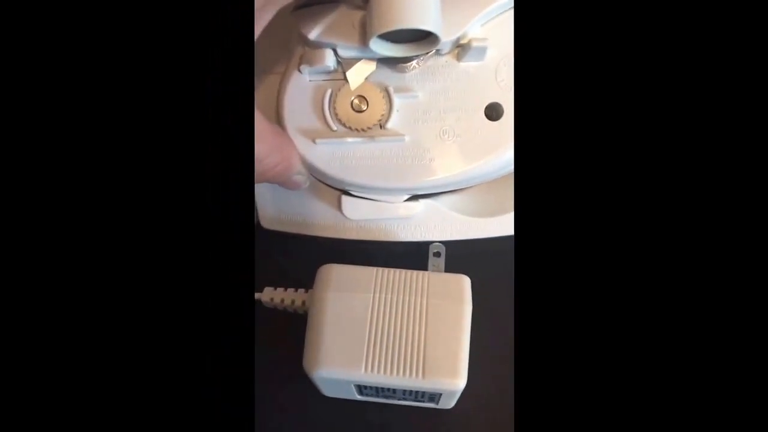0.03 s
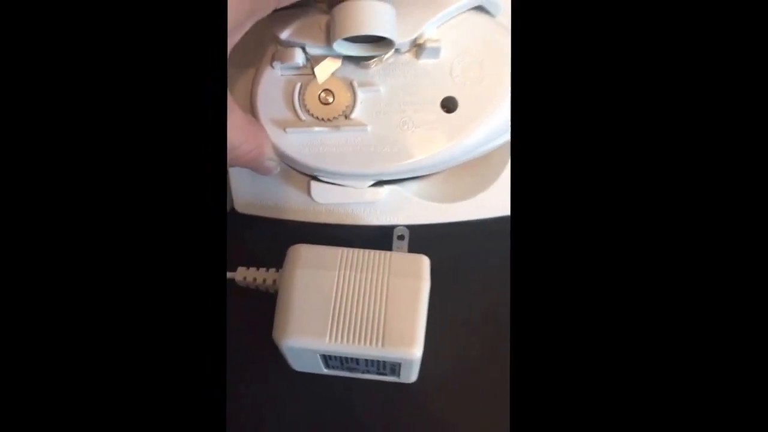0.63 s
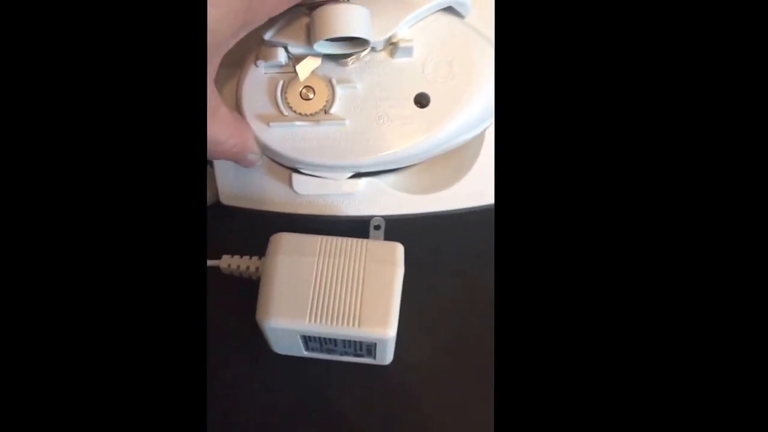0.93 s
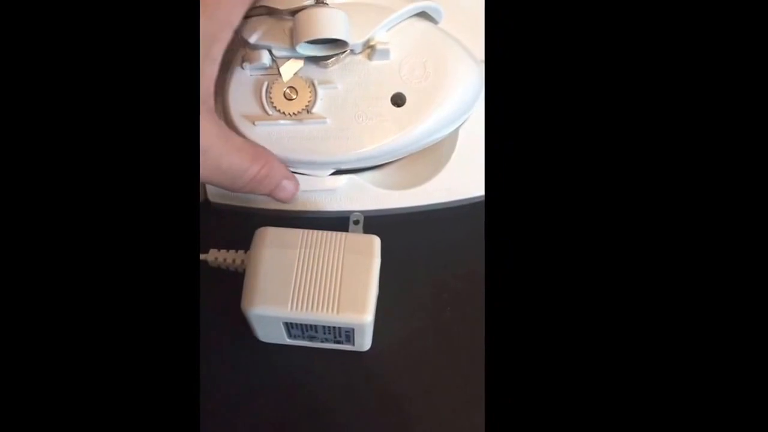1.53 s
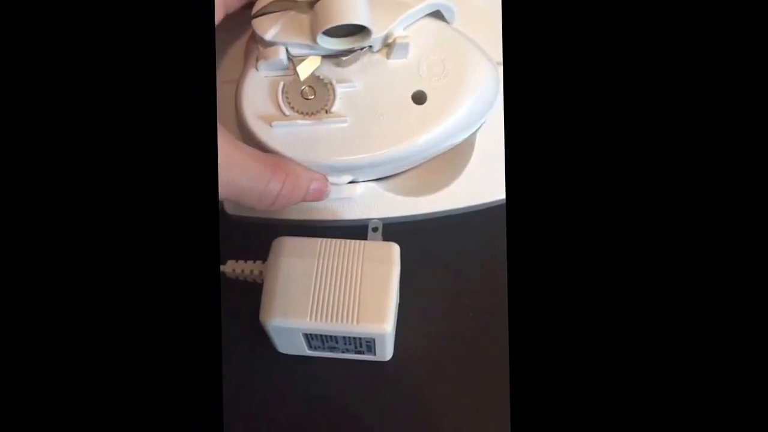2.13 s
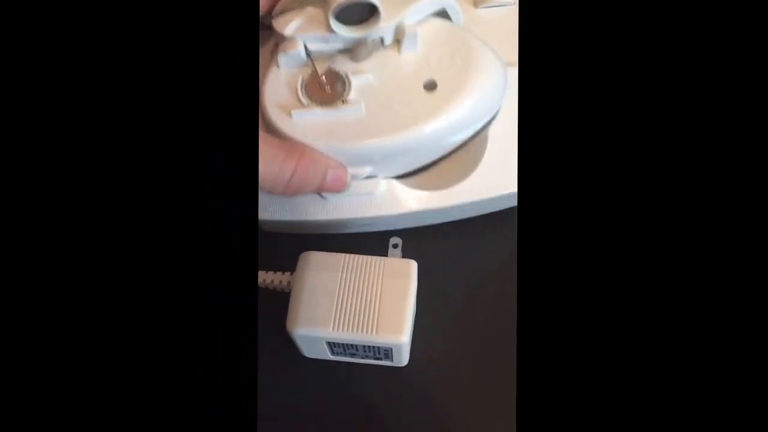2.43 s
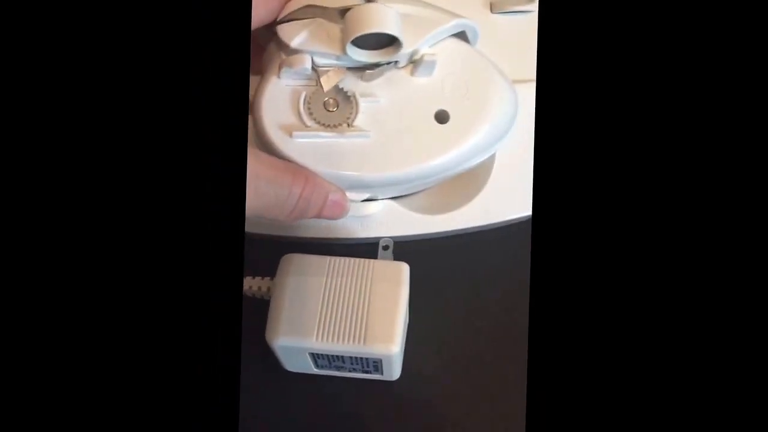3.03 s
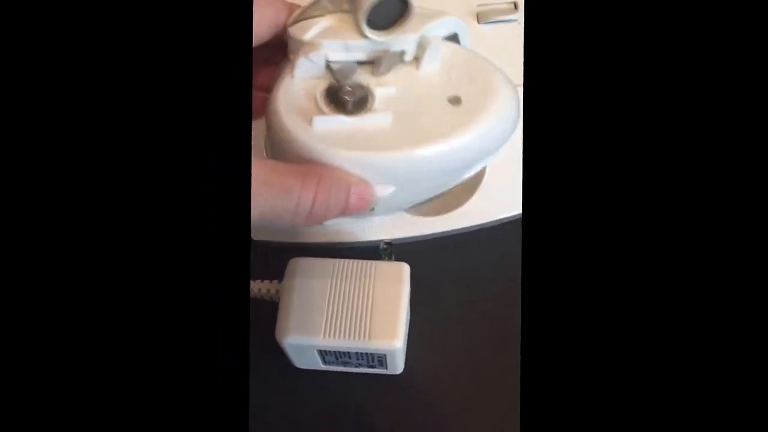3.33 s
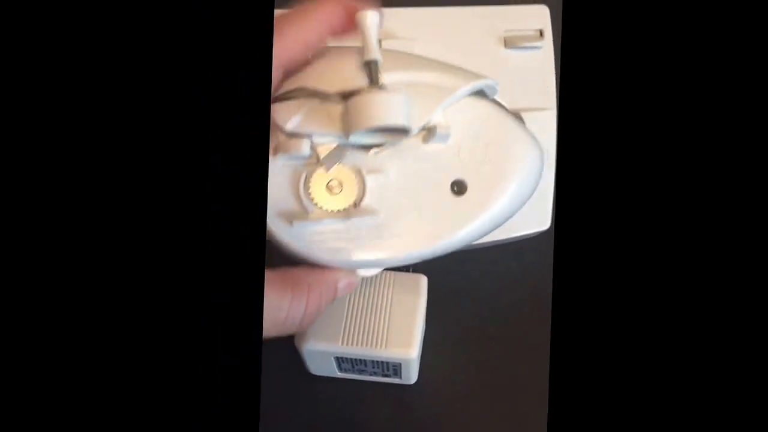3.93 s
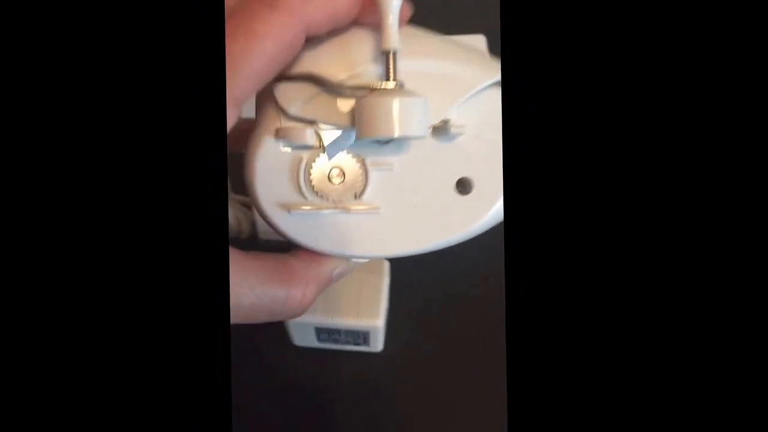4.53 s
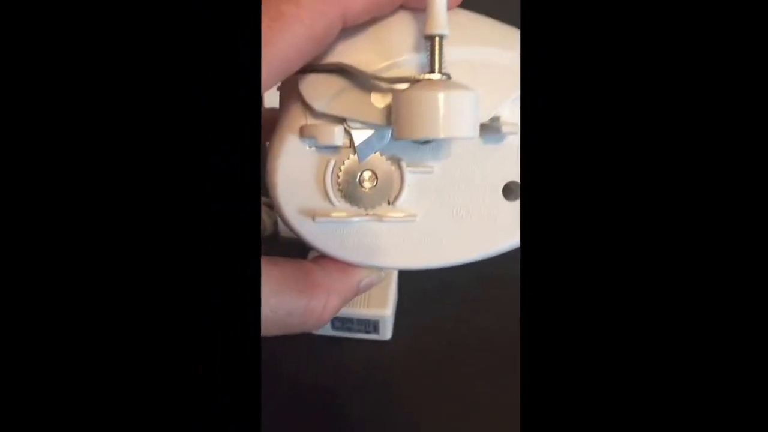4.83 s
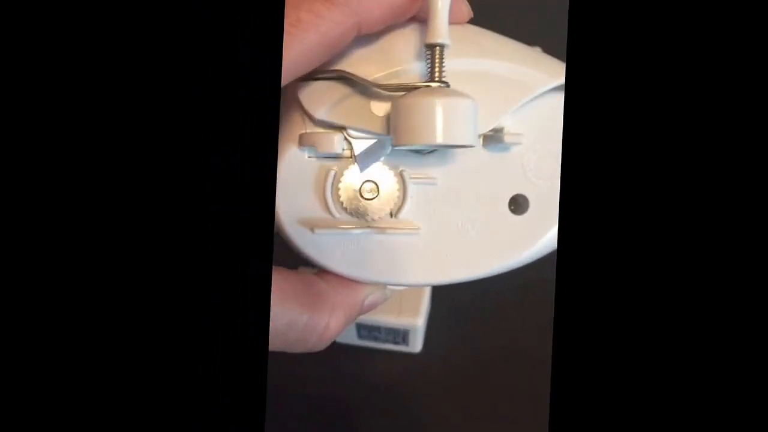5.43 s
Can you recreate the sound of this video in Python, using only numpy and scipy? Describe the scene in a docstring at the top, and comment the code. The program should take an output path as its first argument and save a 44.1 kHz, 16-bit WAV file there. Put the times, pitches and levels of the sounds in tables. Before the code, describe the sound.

A small electric can opener is already running close by on a table in a quiet room. Its motor hums with a grainy whine and a plastic gear rattle that pulses about six times a second, with one sharp click at 0.2 seconds. Just before 1 second the power cuts and the whir sinks in pitch, stopping by about 1.3 seconds. Light taps and faint finger rubs follow. Around 2.1 seconds comes a cluster of sharp plastic clacks with small metallic snaps, and around 2.6 another, with a short scrape, a dull thump and a bright latch ping. Softer knocks and brief plastic scrapes continue, the strongest scrape near 3.4 seconds, ending in a quick metallic click at 3.8. Then there is only very faint room rumble and a tiny tick. At 5.4 seconds the motor spins up again and whirs briefly until the end.

```python
"""A battery can opener whirs on a table, close by in a small room, and coasts to a stop.
Its motor hums, its pinion whines and its gear teeth rattle through the plastic shell.
A hand shifts it in its plastic tray and lifts the cutting lever: plastic knocks, fingers rub,
the steel latch pings and the shell sticks and slips on the tray.
Then the motor starts again with the lever open."""
import sys
import numpy as np
from scipy import signal
from scipy.fft import rfft, irfft
from scipy.io import wavfile
from scipy.ndimage import uniform_filter1d

SR = 44100
rng = np.random.default_rng(int(sys.argv[2]) if len(sys.argv) > 2 else 0)


def put_to_file(sound):
    """Save the sound as 16-bit audio at rate SR, in the file named by the first command-line argument."""
    columns = np.atleast_2d(sound).T  # one column per channel
    safe = np.clip(columns, -1, 1)
    whole_steps = np.round(safe * 32767)
    wavfile.write(sys.argv[1], SR, whole_steps.astype(np.int16))


N = 251370
TIME = np.arange(N) / SR
HIT_TIME = TIME[:SR // 5]
OFF_S, ON_S = .945, 5.409  # power off, and on again
SHUT_HZ, OPEN_HZ = 222.4, 218.3  # shaft speed with the lever shut and open
DRAG_S, FRICTION_HZ = .38, 125  # coasting: drag time constant, speed at which drag equals dry friction


def amp(db):
    """Decibels to gain."""
    return 10 ** (np.asarray(db) / 20)


def unit(x):
    """Scale to rms 1."""
    return x / np.sqrt(np.mean(x ** 2))


def unit_hit(x):
    """Scale a hit to the energy of 10 ms at rms 1."""
    return x / np.sqrt(np.sum(x ** 2) / (SR / 100))


def during(start_s, end_s):
    """A soft-edged gate."""
    return uniform_filter1d(1. * ((TIME >= start_s) & (TIME <= end_s)), size=300)


def band(x, lo_hz, hi_hz, order=2):
    """Butterworth band-pass."""
    return signal.sosfilt(signal.butter(order, [lo_hz, hi_hz], "band", fs=SR, output="sos"), x)


def colour(x, points, resonances=()):
    """EQ by a curve of (Hz, dB) points plus (Hz, width Hz, dB) bells."""
    hz, db = np.transpose(points)
    f = np.maximum(np.fft.rfftfreq(N, 1 / SR), 1)
    bells = sum(gain * np.exp(-((f - centre) / width) ** 2) for centre, width, gain in resonances)
    return irfft(rfft(x) * amp(np.interp(np.log(f), np.log(hz), db) + bells), N)


def wander(rate_hz):
    """Smooth random modulation at rms 1."""
    step = int(SR / rate_hz)
    return unit(uniform_filter1d(np.repeat(rng.standard_normal(N // step + 1), step), step)[:N])


def decay(t60):
    """Envelope of a hit: down 60 dB in t60 seconds."""
    return np.exp(-np.log(1000) * HIT_TIME / t60)


def ring(modes, scatter_db):
    """Struck modes; every contact point weights them differently."""
    out = 0
    for hz, db, t60 in modes:
        gain = amp(db + scatter_db * rng.standard_normal()) * rng.choice([-1, 1])
        detuned_hz = hz * (1 + .018 * rng.standard_normal())
        out += gain * decay(t60) * np.sin(2 * np.pi * detuned_hz * HIT_TIME)
    return out


def burst(t60, tail_db, tail_t60):
    """Crowded modes as noise: a half-millisecond attack, a fast decay and a weaker tail."""
    attack = np.minimum(HIT_TIME / .0005, 1)
    return rng.standard_normal(len(HIT_TIME)) * attack * (decay(t60) + amp(tail_db) * decay(tail_t60))


def add(out, start_s, x):
    """Mix a sound in at its cue."""
    i = int(start_s * SR)
    out[i:i + len(x)] += x[:N - i]


def mesh_tightness(lag_s=0, gear_hz=6.2, tightest_s=-.008):
    """An off-centre slow gear swings the mesh from loose (-1) to tight (1) once a turn."""
    return np.cos(2 * np.pi * gear_hz * (TIME - tightest_s - lag_s))


def shaft_speed(settle_hz=6, settle_s=.16, spin_up_s=.035):
    """Turns per second: settling under power, braked by drag and friction, then spinning up again."""
    sag_hz = 1.3 * mesh_tightness(lag_s=.022)  # a tight mesh slows the shaft a moment later
    powered = SHUT_HZ - settle_hz * np.exp(-TIME / settle_s) - sag_hz
    first_run = (powered + FRICTION_HZ) * np.exp(-np.maximum(TIME - OFF_S, 0) / DRAG_S) - FRICTION_HZ
    second_run = (OPEN_HZ - sag_hz) * (1 - np.exp(-np.maximum(TIME - ON_S, 0) / spin_up_s))
    return np.maximum(first_run, 0) + second_run


def rough_tone(cycles, roughness, rate_hz):
    """A tone that flutters in level and phase."""
    flutter = 1 + roughness * (wander(rate_hz) + 1j * wander(rate_hz))
    return (np.exp(2j * np.pi * cycles) * flutter).real


# Motor harmonics: (multiple of shaft speed, lever-shut level [dB], lever-open level [dB], roughness [0-1])
HUM_TONES = [(1, -47, -60, .06), (3, -40, -49, .16), (4, -39.5, -35, .32), (6, -33, -50, .6),
             (8, -50, -44, .5)]
def motor_hum(turns):
    """Shaft and commutator tones, locked to the rotation."""
    hum = 0
    for multiple, shut_db, open_db, roughness in HUM_TONES:
        peak = np.sqrt(2) * amp(np.where(TIME > ON_S, open_db, shut_db))
        hum += peak * rough_tone(multiple * turns, roughness, rate_hz=110)
    return hum


def pinion_whine(turns, shut_db=-32.5, open_db=-29.5, swell_db=5.5):
    """Nine meshing teeth sing a grainy note that swells in a tight mesh."""
    tone = np.sin(2 * np.pi * 9 * turns + .7 * wander(110)) * (1 + .33 * wander(120))
    return tone * amp(np.where(TIME > ON_S, open_db, shut_db) + swell_db * mesh_tightness())


def tooth_strikes(turns, scatter_db=5.5, chatter_db=.5, hiss_db=-4.5):
    """Pinion teeth strike, harder once a turn of the middle and slow gears; the brushes hiss."""
    teeth = np.flatnonzero(np.diff(np.floor(9 * turns)))
    backlash = rng.integers(0, 24, len(teeth))  # samples late
    strengths = amp(scatter_db * rng.uniform(-1, 1, len(teeth))) * rng.choice([-1, 1], len(teeth))
    hits = np.zeros(N)
    hits[np.minimum(teeth + backlash, N - 1)] = strengths
    hits /= np.sqrt(np.abs(uniform_filter1d(hits ** 2, size=1300)) + 1e-4)  # level out over 30 ms
    brushes = amp(hiss_db) * rng.standard_normal(N)
    middle_gear = np.cos(2 * np.pi * turns / 5.8)
    return (hits + brushes) * amp(chatter_db * middle_gear + .78 * mesh_tightness() + .87 * wander(90))


def shell_rattle(force, gate, shell_eq, gearbox_eq, body_db, treble_db):
    """Tooth strikes radiate through gearbox and shell; body and treble each have a fader."""
    sound = colour(force, shell_eq, gearbox_eq)
    treble = colour(sound, [(2000, -40), (3500, -8), (5000, 0)])
    body, treble = (x / np.sqrt(np.average(x ** 2, weights=gate)) for x in (sound - treble, treble))
    return gate * (amp(body_db) * body + amp(treble_db) * treble)


# Shell colour with the lever shut, coasting, and with the lever open: (frequency [Hz], gain [dB])
SHUT_EQ = [(60, -36), (440, -35), (560, -18), (760, -18.5), (950, 2), (1080, -7.5), (1330, -2.5),
           (1570, -9.5), (2700, -12), (4300, -13), (5200, -17), (6500, -26.5), (8000, -24.5),
           (15500, -30.5)]
COAST_EQ = [(60, -37), (380, -26), (490, -26.5), (590, -0.5), (690, -10), (980, 3), (1100, -6.5),
            (1400, -1.5), (1820, -11.5), (3300, -14.5), (4500, -16), (6500, -27), (8000, -29), (15500, -35)]
OPEN_EQ = [(60, -63), (420, -32), (600, -14.5), (720, -17), (890, 5), (1130, -6), (1450, 3), (2000, 1),
           (2800, -4), (3900, -6.5), (5200, -13), (6400, -14.5), (8000, -22.5), (11500, -18.5),
           (15500, -26)]
# Gearbox resonances and hollows, lever shut and open: (centre [Hz], width [Hz], gain [dB])
SHUT_BELLS = [(1364, 180, 6), (1710, 31, 3), (2070, 58, -4), (2260, 120, 6.5), (3195, 240, 5),
              (4880, 240, -4.5), (5550, 100, 3.5), (6450, 310, 10), (10250, 350, -2.5), (11800, 700, 5.5)]
OPEN_BELLS = [(1405, 39, -1), (2650, 78, 4), (2800, 100, -0.5), (3280, 45, 8.5), (3900, 120, 6),
              (5800, 96, 7), (10120, 430, -4)]
def gear_train(turns, shaft_hz):
    """Driven gears rattle; with the power off the teeth go slack and growl, chugging once a turn."""
    stop_s = OFF_S + DRAG_S * np.log(1 + SHUT_HZ / FRICTION_HZ)
    first_run, second_run = during(0, stop_s), during(ON_S, TIME[-1])
    slack = np.clip((215 - shaft_hz) / 45, 0, 1)
    force = tooth_strikes(turns)
    driven = shell_rattle(force, first_run, SHUT_EQ, SHUT_BELLS, body_db=-3, treble_db=-13.5)
    chug = unit(amp(2.2 * np.cos(2 * np.pi * turns) + 1.2 * wander(35)))
    dull_db = 15 * (1 - shaft_hz / SHUT_HZ)
    growl = shell_rattle(force * chug, first_run, COAST_EQ, SHUT_BELLS, body_db=.5, treble_db=-9 - dull_db)
    coasting = growl + first_run * coast_whine(turns)
    restarted = shell_rattle(force, second_run, OPEN_EQ, OPEN_BELLS, body_db=-3, treble_db=-10.5)
    gears = (1 - slack) * amp(-22.5) * driven + slack * amp(-30) * coasting + amp(-25.5) * restarted
    rasp = colour(gears, [(1400, -40), (2000, 0), (4500, 0), (6000, -30)])
    return gears + .22 * (1 - slack) * mesh_tightness() * rasp


def coast_whine(turns):
    """Commutator and pinion tones sink through the shell's resonances as the motor runs down."""
    tones = sum(rough_tone(k * turns, roughness=.25, rate_hz=120) / np.sqrt(k / 3) for k in (3, 4, 6, 9))
    return colour(tones, COAST_EQ)


def motor(start_power=.91, coast_power=.26, stall_hz=37):
    """The whole drive: hum and pinion whine need speed, while the gears carry on almost to rest."""
    shaft_hz = shaft_speed()
    speed = shaft_hz / SHUT_HZ
    turns = np.cumsum(shaft_hz * (1 + .002 * wander(60))) / SR
    tones = speed ** 7 * (motor_hum(turns) + pinion_whine(turns))
    stall_fade = np.minimum(shaft_hz / stall_hz, 1) ** 3
    gear_gain = speed ** np.where(TIME > ON_S, start_power, coast_power) * stall_fade
    return tones + gear_gain * gear_train(turns, shaft_hz)


# Colour of the room tone: (frequency [Hz], gain [dB])
ROOM_EQ = [(20, -29.5), (35, -16), (58, 2), (82, -11.5), (115, -4), (160, -15), (220, -12), (300, -19),
           (500, -26), (1200, -27.5), (3000, -30), (6000, -34.5), (15500, -39)]
def room_tone():
    """A steady bed of low rumble."""
    return unit(colour(rng.standard_normal(N), ROOM_EQ))


# Modes of the plastic shell, table top and plastic tray: (frequency [Hz], level [dB], t60 [s])
SHELL_RING = [(992, -3.5, 0.068), (1140.5, 1, 0.035), (1240, 1.5, 0.024), (1345, 1.5, 0.039),
              (1620, -3, 0.043), (1722, -4, 0.067), (2010, 1, 0.043), (2390, -5, 0.063), (2640, -9, 0.11),
              (3245, -6, 0.043), (4080, -10, .05)]
TABLE_RING = [(69.4, -2.5, 0.15), (92.5, -3, 0.16), (135, -0.5, 0.12), (196, -9, 0.12), (249, 6, 0.029),
              (328, 2, 0.077)]
TRAY_RING = [(580, -9.5, 0.044), (604, 0.5, 0.12), (655, 1, 0.082), (799, 1.5, .08), (886, -2, .05)]
# Plastic parts knocking: (time [s], level [dB], hardness as tilt [dB/octave], relative thump [dB])
KNOCK_CUES = [(.198, -27, 0.5, -14), (1.234, -47, 1, -17), (1.257, -38, -6.5, -19), (1.442, -51.5, -12, -5),
              (1.544, -38, -2.5, -16), (1.588, -48.5, 3.5, -7), (1.768, -45, -3.5, -5.5),
              (1.989, -48, -3, -10), (2.029, -31, -2.5, -23), (2.053, -25, -1, -12), (2.0605, -20, -2, -35),
              (2.1153, -21.5, -4.5, -25.5), (2.123, -24.5, -4.5, -6.5), (2.170, -39.5, 2.5, -20),
              (2.23, -47.5, -2, -4.5), (2.496, -42.5, -9, -4.5), (2.536, -28, -5.5, -12),
              (2.5645, -21.5, -4.5, -1), (2.574, -34, -15, 5), (2.603, -37, 5, -15.5), (2.628, -32, -5, -2),
              (2.745, -49, -16, 2), (2.815, -30.5, -4, -1.5), (2.967, -38.5, -5, 1), (2.999, -40, -6.5, -3),
              (3.025, -46, -9, -12), (3.09, -49, -7, -1), (3.183, -47, -10, -2.5), (3.21, -36.5, -4, -5.5),
              (3.253, -40, -3.5, -3), (3.351, -33, -12.5, -8.5), (3.388, -36, -1.5, -1.5),
              (3.425, -32, -6, -4), (3.446, -37, -7, 3.5), (3.654, -58.5, 8, -15), (3.666, -44.5, 3, -20.5),
              (3.673, -40.5, -3, -0.5), (3.688, -46, 2, -11), (3.801, -47.5, 2.5, -42),
              (3.814, -43.5, 8, -52), (3.828, -47, 5, -34), (4.233, -55.5, -0.5, -23)]
def knocks(cues):
    """Each contact cracks and rings the shell; 2 ms later the table thumps and the tray rings."""
    out = np.zeros(N)
    for start_s, db, tilt_db, thump_db in cues:
        body = unit_hit(ring(SHELL_RING, scatter_db=4.5))
        body += amp(-1) * unit_hit(burst(t60=.029, tail_db=-14, tail_t60=.096))
        shell = unit_hit(band(body, 820, 2100, order=3))
        impact = burst(t60=.0095, tail_db=-14, tail_t60=.089)
        clack = unit_hit(band(impact + amp(-9) * body, 1890, 4300))
        contact = burst(t60=.017, tail_db=-14.5, tail_t60=.13)
        crack = unit_hit(band(contact, 5500, 7200, order=1) + amp(-20.5) * band(contact, 7000, 13500))
        table = unit_hit(ring(TABLE_RING, scatter_db=3))
        thud = unit_hit(band(burst(t60=.078, tail_db=-13.5, tail_t60=.12), 88, 380))
        thump = unit_hit(table + amp(-5) * thud)
        tray = unit_hit(ring(TRAY_RING, scatter_db=1))
        # shell, clack and crack lie about an octave apart
        add(out, start_s, amp(db) * (shell + amp(tilt_db) * clack + amp(2 * tilt_db - 7) * crack))
        add(out, start_s + .002, amp(db) * (amp(thump_db) * thump + amp(thump_db / 2 - 4) * tray))
    return out


# Finger strokes: (peak time [s], half length [s], level [dB])
RUB_CUES = [(1.364, .009, -54.5), (1.557, 0.081, -59.5), (1.754, .09, -58.5), (1.91, .09, -64.5),
            (2.42, 0.16, -60), (2.426, .02, -49.5), (3.548, 0.035, -66)]
# Colour of skin on plastic: (frequency [Hz], gain [dB])
RUB_EQ = [(50, -14.5), (120, -1.5), (270, 5), (450, -10), (620, -6), (1200, -6.5), (3000, -16), (7000, -26),
          (15000, -27)]
def finger_rubs():
    """Skin rubs dully over the housing, each stroke swelling and fading."""
    rub = unit(colour(rng.standard_normal(N) * amp(2.8 * wander(30)), RUB_EQ))
    return rub * sum(amp(db) * np.exp(-((TIME - peak_s) / half_s) ** 2) for peak_s, half_s, db in RUB_CUES)


# Latch and spring snapping: (time [s], level [dB])
SNAP_CUES = [(1.547, -45), (2.128, -36), (2.171, -32.5), (2.599, -25), (3.815, -35), (3.817, -40.5),
             (3.827, -36.5), (4.652, -77)]
# Modes of the steel latch: (frequency [Hz], level [dB], t60 [s])
LATCH_RING = [(3700, -7, .02), (4500, -8, .02), (6010, 0, .022), (6250, -3, .025), (6610, -1, .022),
              (7150, -1, .02), (7550, -4, .02)]
def latch_snaps():
    """The steel latch snaps with a short, bright ping and a faint tick."""
    out = np.zeros(N)
    for start_s, db in SNAP_CUES:
        tick = unit_hit(band(burst(t60=.017, tail_db=-21.5, tail_t60=.075), 2000, 19000))
        ping = unit_hit(ring(LATCH_RING, scatter_db=2))
        add(out, start_s, amp(db) * (ping + amp(-15) * tick))
    return out


# Pushes that slide the opener in its tray: (time [s], length [s], scrape level [dB], rumble level [dB])
PUSH_CUES = [(2.113, 0.074, -51, -59.5), (2.491, 0.15, -42, -55), (2.75, .045, -55, -59),
             (2.936, .18, -53.5, -54), (3.182, .12, -49.5, -57), (3.343, 0.084, -37, -41)]
# Colour of the scrape: (frequency [Hz], gain [dB])
SCRAPE_EQ = [(400, -18.5), (620, 3), (730, 2.5), (1150, 2), (1900, -6.5), (3100, -6.5), (4500, -16),
             (7000, -18.5), (10000, -25.5), (15000, -28)]
def tray_scrapes(slips_per_s=1800, scatter_db=4.5, grip_s=.01, release_t60=.22):
    """Plastic sticks and slips on plastic in uneven spurts, ringing the tray; the table rumbles under it."""
    slips = (rng.random(N) < slips_per_s / SR) * rng.choice([-1, 1], N)
    slips = slips * amp(scatter_db * rng.standard_normal(N))
    spurts = unit(amp(5 * wander(70)))
    tray_bells = [(hz, 18, 3.5) for hz, _, _ in TRAY_RING]
    scrape = unit(band(colour(slips * spurts, SCRAPE_EQ, tray_bells), 560, 18000))
    treble = colour(scrape, [(2500, -40), (4000, -8), (5500, 0)])
    rumble = unit(band(rng.standard_normal(N), 75, 330))
    hardest_db = max(scrape_db for _, _, scrape_db, _ in PUSH_CUES)
    out = np.zeros(N)
    for start_s, length_s, scrape_db, rumble_db in PUSH_CUES:
        grip = np.clip((TIME - start_s) / grip_s, 0, 1)
        release = amp(-60 * np.clip((TIME - start_s - length_s) / release_t60, 0, 2))
        treble_db = -1 - .4 * (hardest_db - scrape_db)  # softer pushes are duller
        dulled = scrape - treble + amp(treble_db) * treble
        out += grip * release * (amp(scrape_db) * dulled + amp(rumble_db) * rumble)
    return out


def bump_cues(bumps_per_s=40, spread_db=8, tilt_db=-6, thump_db=-5.5):
    """The sliding opener bumps at random moments of each push: extra cues for knocks()."""
    cues = []
    for start_s, length_s, scrape_db, _ in PUSH_CUES:
        draws = rng.random(size=(24, 2))
        for when, strength in draws[:int(length_s * bumps_per_s)]:
            db = scrape_db - 2 + spread_db * (strength - .5)
            cues.append((start_s + when * length_s, db, tilt_db, thump_db))
    return cues


def room_echo(x, wet_db, t60):
    """Add a short, dull echo from the table and walls."""
    echo = band(rng.standard_normal(len(HIT_TIME)), 220, 3800) * decay(t60) * (HIT_TIME > .005)
    return x + amp(wet_db) * signal.fftconvolve(x, echo / np.sqrt(np.sum(echo ** 2)))[:N]


def scene():
    """Motor and handling over the quiet rumble of the room, in mono."""
    bed = amp(-67.5) * room_tone()
    opener = motor() + tray_scrapes() + finger_rubs() + latch_snaps() + knocks(KNOCK_CUES + bump_cues())
    return (room_echo(opener, wet_db=-20, t60=.19) + bed)[None]


def record(dry):
    """The microphone cuts the bass below 30 Hz and the top above 15.6 kHz."""
    thinned = signal.sosfilt(signal.butter(2, 30, "high", fs=SR, output="sos"), dry)
    return signal.sosfilt(signal.ellip(10, .2, 70, 15600, fs=SR, output="sos"), thinned)


dry = scene()
out = record(dry)
put_to_file(out)
```